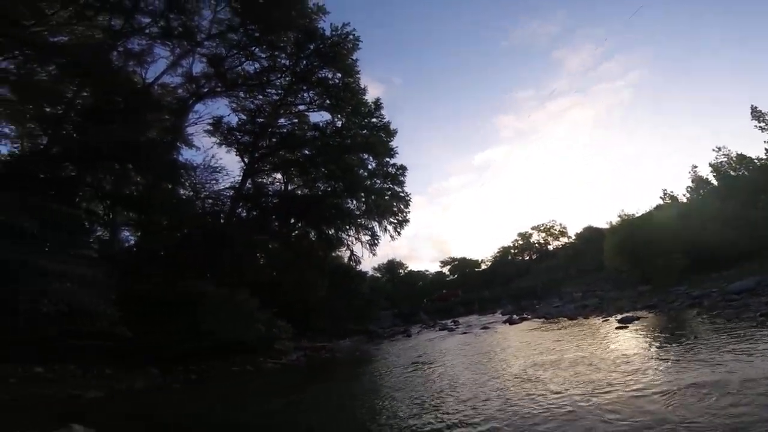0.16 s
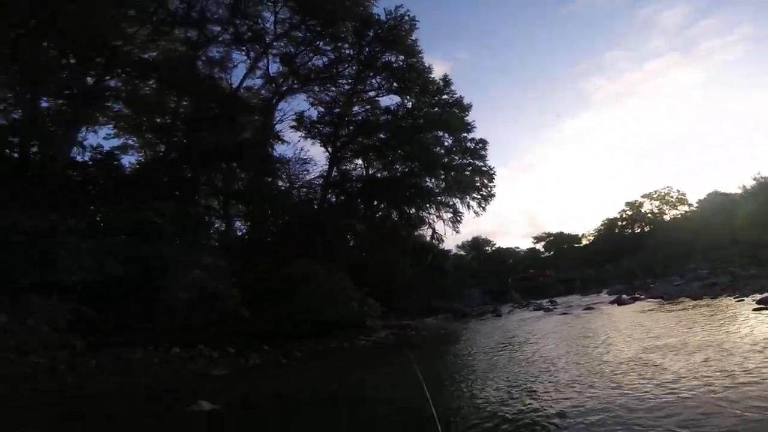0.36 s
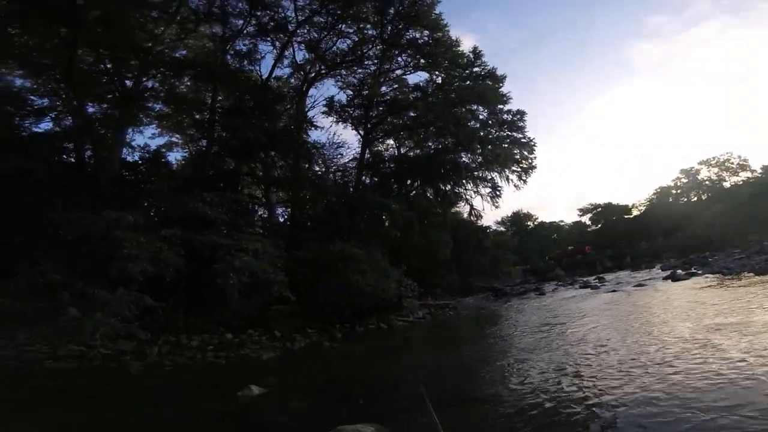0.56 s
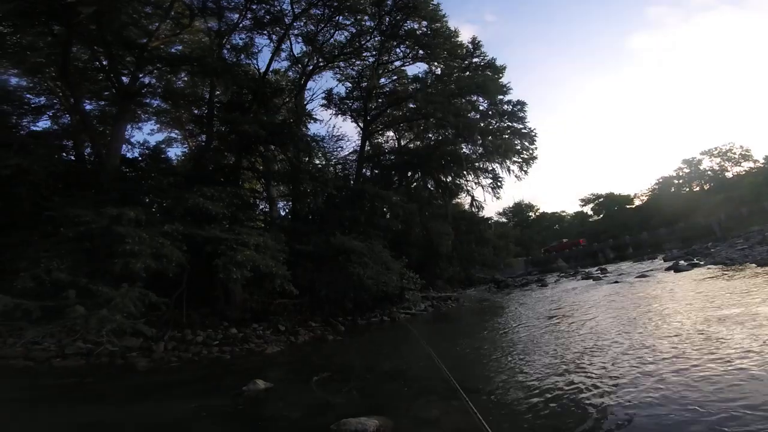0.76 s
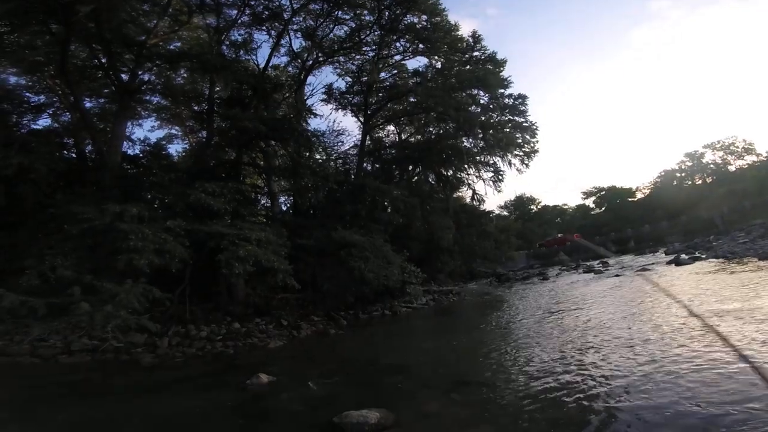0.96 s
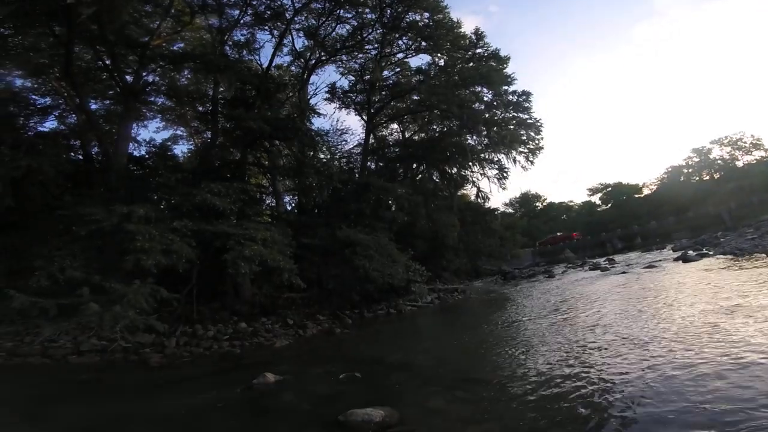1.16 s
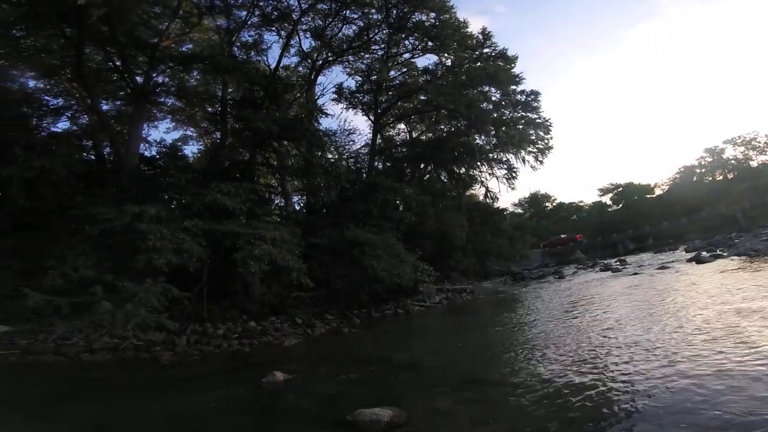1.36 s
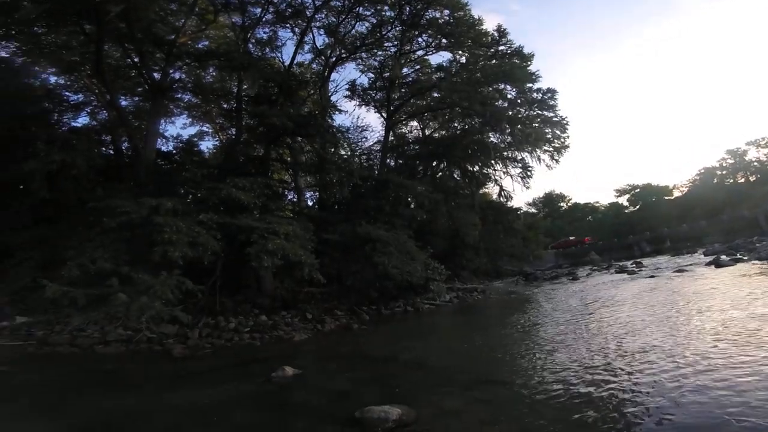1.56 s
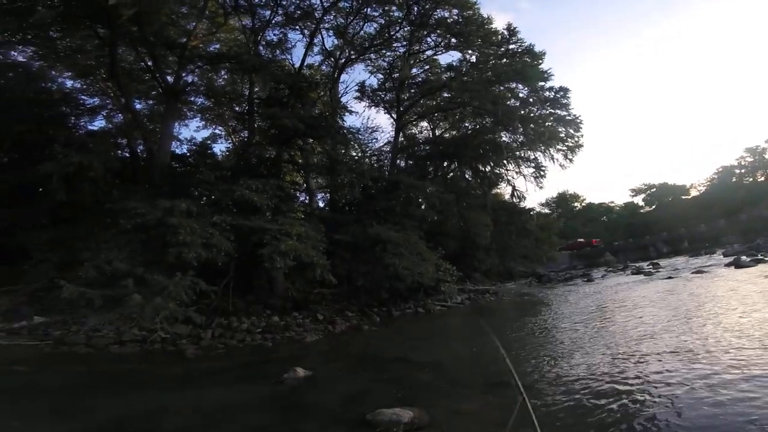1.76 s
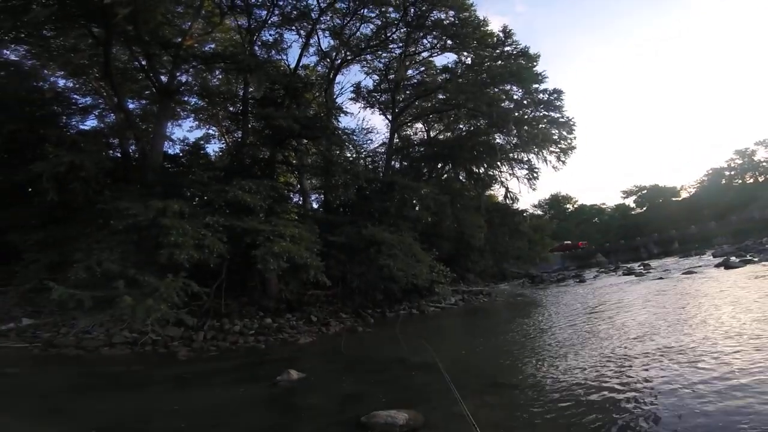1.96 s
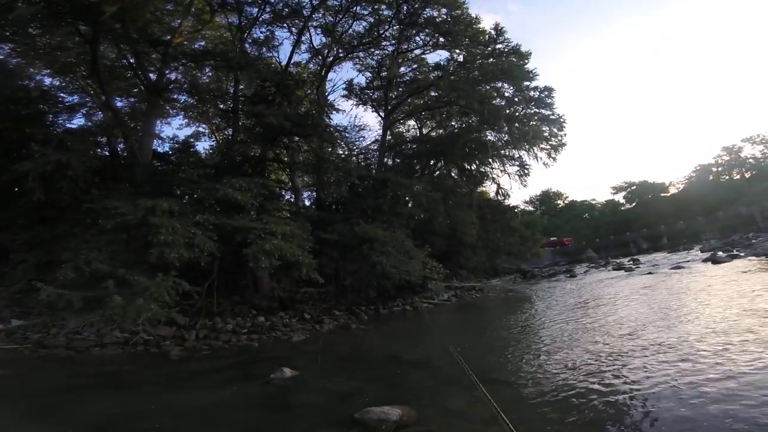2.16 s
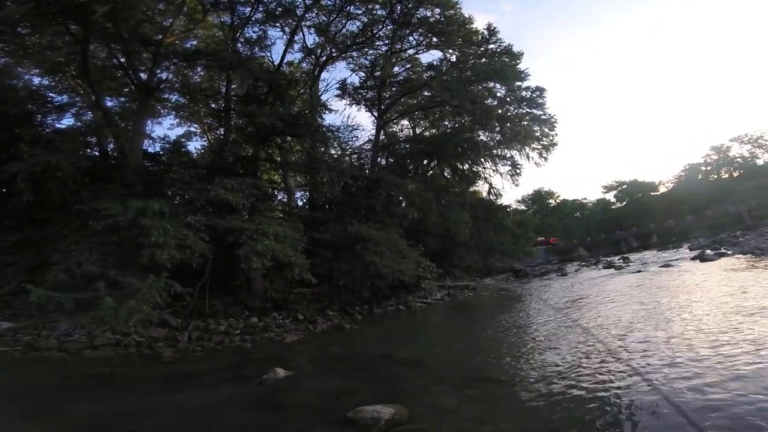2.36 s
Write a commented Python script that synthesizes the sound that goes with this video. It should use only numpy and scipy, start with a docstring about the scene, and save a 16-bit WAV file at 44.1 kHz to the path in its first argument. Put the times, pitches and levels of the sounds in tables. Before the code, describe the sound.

Fishing rod swishing back and forth over the steady rush of a river.

```python
"""Beside a shallow river, a fly rod is whipped back and forth, heard from inside a case worn by the angler.
Turbulent water rushes and its bubbles ring throughout, over a low rumble of air on the case.
The line hisses through the guides, rod and line whistle as they shed vortices, the line ticks
against the rod, the tackle rattles, and the line finally lands on the water with a hiss.
The case's resonances colour the treble of it all."""
import sys
import numpy as np
from scipy import signal
from scipy.fft import rfft, irfft
from scipy.io import wavfile

SR = 44100
rng = np.random.default_rng(int(sys.argv[2]) if len(sys.argv) > 2 else 0)


def store_pcm(level_fs):
    """Save levels as 16-bit WAV."""
    pcm = np.round(np.clip(level_fs, -1, 1) * 32767).astype(np.int16)
    wavfile.write(sys.argv[1], SR, np.atleast_2d(pcm).T)


N = 105840
T = np.arange(N) / SR


def undb(db):
    """Decibels to amplitude ratio."""
    return 10 ** (np.asarray(db) / 20)


def unit(x):
    """Normalise to rms 1."""
    return x / np.sqrt(np.mean(x ** 2))


def colour(x, points, size=4096):
    """Minimum-phase filter through points of (frequency [Hz], gain [dB])."""
    hz, db = np.array(points).T
    f = np.maximum(np.fft.rfftfreq(size, 1 / SR), 1)
    cepstrum = irfft(np.log(undb(np.interp(np.log(f), np.log(hz), db))))
    cepstrum[1:size // 2] *= 2
    cepstrum[size // 2 + 1:] = 0
    return signal.fftconvolve(x, irfft(np.exp(rfft(cepstrum))))[:N]


def noise(gain):
    """Gaussian noise of rms 1, its amplitude spectrum shaped by gain(frequency [Hz])."""
    f = np.maximum(np.fft.rfftfreq(N, 1 / SR), 1)
    return unit(irfft(rfft(rng.standard_normal(N)) * gain(f), N))


def walk(bandwidth_hz):
    """Smooth random fluctuation: low-pass noise of rms 1."""
    return noise(lambda f: np.exp(-(f / bandwidth_hz) ** 2))


def decay(start, seconds):
    """Envelope of a damped vibration: sudden onset, exponential fall."""
    return (T >= start) * np.exp(-np.maximum(T - start, 0) / seconds)


def river(bands=8, level_db=-48.5, swell_db=.53, ripple_db=.96):
    """Turbulence over stones makes broadband noise: octave bands ripple singly and swell together."""
    # spectrum of the rush: (frequency [Hz], relative level [dB])
    spectrum = [(100, 1.5), (300, 1), (480, -1), (750, -0.5), (1000, -2), (1300, -6.5), (1700, -5.5),
                (2500, -10.5), (4200, -17), (7000, -19), (9300, -21.5), (13000, -23)]
    edges = np.concatenate([[0], SR / 2 / 2. ** np.arange(bands)[::-1]])
    rush = 0
    for low, high in zip(edges, edges[1:]):
        band = np.sqrt(high - low) * noise(lambda f: (f > low) & (f <= high))
        rush += band * undb(ripple_db * walk(23))
    return undb(level_db + swell_db * walk(4.3)) * unit(colour(rush, spectrum))


def bubbles(per_second=500, level_db=-60, low_hz=502.4, high_hz=2590, decay_cycles=4.8, size=2048):
    """Bubble resonance: each small pocket of trapped air rings as a damped oscillator, rising in pitch."""
    out, t = np.zeros(N + size), np.arange(size) / SR
    for when, pitch, chance in rng.random((int(per_second * N / SR), 3)):
        hz = low_hz * (high_hz / low_hz) ** pitch
        age = hz * t / decay_cycles
        strength_db = min(-4.5 * np.log(1 - chance), 13.5)  # exponentially distributed, with a cap
        ring = np.exp(-age) * np.sin(2 * np.pi * hz * t * (1 + .03 * age))
        onset = int(when * N)
        out[onset:onset + size] += undb(strength_db) * ring
    return undb(level_db) * unit(out[:N])


def rumble(settle_db_per_s=2.5):
    """Forced vibration: air and movement shake the case, whose low modes fade as the angler settles."""
    # spectrum of the air on the case: (frequency [Hz], relative level [dB])
    spectrum = [(8, -8), (18, -6), (30, -1.5), (40, 3.5), (54, -9), (85, -7), (115, -8.5), (160, -27),
                (400, -40.5)]
    # envelope of that air noise: (time [s], level [dB])
    envelope = [(0, -48), (.2, -46), (.36, -42), (.65, -47), (1.25, -49.5), (1.55, -50), (1.82, -44),
                (2.1, -51.5), (2.4, -52.5)]
    # low modes of the case: (frequency [Hz], half-width [Hz], initial level [dB])
    modes = [(128.3, 10, -55.5), (184, 8, -56.5), (208.7, 16, -57.5), (255.6, 10, -61.5)]
    hz, db = np.array(spectrum).T
    air = noise(lambda f: undb(np.interp(np.log(f), np.log(hz), db)))
    air *= undb(np.interp(T, *np.array(envelope).T))
    ring = sum(undb(level) * noise(lambda f: 1 / (1 + ((f - centre) / width) ** 2))
               for centre, width, level in modes)
    return air + ring * undb(-settle_db_per_s * T)


def line_hiss(grain_db=3.0, grain_hz=500, top_hz=10500):
    """Contact noise in grainy swells: the line runs through the guides and finally lands on the water."""
    # swells of hiss: (peak time [s], level [dB], rise [s], fall [s], centre [Hz], half-width [octaves])
    swells = [(.235, -57.5, 0.046, 0.062, 5240, 0.41), (.34, -53.5, 0.013, .012, 7000, 1),
              (.417, -39, .008, .010, 3900, .33), (.425, -48, .02, .075, 2700, .8),
              (.456, -39, 0.013, 0.016, 6900, .42), (.476, -40, .016, 0.014, 6000, .7),
              (0.502, -46.5, 0.004, .008, 4100, 0.72), (.53, -55, 0.04, 0.047, 4700, 1),
              (.583, -54, 0.0024, 0.0055, 3500, .5), (1.165, -50.5, .07, .05, 5460, .28),
              (1.302, -39.5, .008, .007, 5500, .7), (1.33, -56, 0.033, .05, 4970, 1),
              (1.708, -54, .018, 0.046, 6000, .5), (1.737, -46.5, .005, .004, 3800, .35),
              (1.762, -49, .016, .018, 7400, 1), (1.83, -52.5, .014, .02, 3700, .65),
              (1.865, -54, .02, .07, 2700, .6), (1.945, -61, 0.033, .03, 6500, 0.32)]
    out = 0
    for peak, db, rise, fall, hz, octaves in swells:
        swell = np.where(T < peak, np.exp(-((T - peak) / rise) ** 2), decay(peak, fall))
        hiss = noise(lambda f: 1 / (1 + (np.log2(f / hz) / octaves) ** 2)
                     * (f / (f + hz / 10)) ** 2  # bass roll-off
                     / (1 + (f / top_hz) ** 12))
        out += undb(db) * swell * hiss
    return out * unit(undb(grain_db * walk(grain_hz)))


def whistle(flutter_hz=530, flutter_db=2.7, waver=.009, skirt_hz=1220, side_ratio=.955, side_db=-11):
    """Aeolian tone: rod and line shed vortices at a frequency that climbs with their speed."""
    # course of the tone, one list per stroke of the rod: (time [s], frequency [Hz], level [dB])
    strokes = [
        [(.406, 3110, -58), (.412, 3550, -40), (.419, 4155, -36), (.423, 4700, -31.5), (.434, 4860, -25.7),
         (.443, 4892, -31.5), (.449, 5250, -34), (.454, 6500, -46), (.462, 6940, -60)],
        [(1.731, 3400, -54), (1.737, 3700, -49), (1.7415, 4550, -50), (1.744, 4720, -37.5), (1.7475, 4850, -52),
         (1.7503, 4980, -36.7), (1.755, 5150, -54), (1.759, 5460, -64)],
        [(1.818, 3500, -62), (1.827, 4100, -56), (1.835, 4880, -50), (1.842, 5170, -70)],
    ]
    # timbre of each stroke, relative to the tone: (noise at the peak [dB], second harmonic [dB])
    timbres = [(-17, -40), (-8, -15), (-4, -20)]
    out = 0
    for stroke, (skirt_db, octave_db) in zip(strokes, timbres):
        times, hz, db = np.array(stroke).T
        level = np.interp(T, times, db)
        pitch = np.interp(T, times, hz) * (1 + waver * walk(flutter_hz))
        phase = 2 * np.pi * np.cumsum(pitch) / SR
        side = undb(side_db) * np.sin(side_ratio * phase)  # a slower stretch of line beats with the tone
        partials = np.sin(phase) + side + undb(octave_db) * np.sin(2 * phase)
        flutter = undb(flutter_db * np.clip(walk(flutter_hz), -3, 1))
        tone = unit(flutter * partials)
        skirt = unit(walk(skirt_hz) * np.sin(phase) + walk(skirt_hz) * np.cos(phase))
        breath = undb(skirt_db + .4 * (db.max() - level))  # noisier where the tone is weak
        sounding = (T > times[0]) * (T < times[-1])
        out += sounding * undb(level) * (tone + breath * skirt) / np.hypot(1, breath)
    return out


def line_ticks(fizz_db=-17.5, fizz_s=.0025):
    """Impact excitation: the line strikes the rod, giving a ring of a few cycles and a short fizz."""
    # strikes: (time [s], level [dB], ring frequency [Hz], rise [s])
    strikes = [(.4406, -24, 7600, .00018), (.4585, -21, 7400, .00024), (.4662, -17.5, 6100, .00016),
               (0.4761, -19.5, 5700, .00013), (0.8566, -38.5, 5240, .0004), (1.229, -39, 4900, .0003),
               (1.3330, -34.5, 6100, .0004), (1.712, -43, 6200, .0003), (1.767, -39, 6500, 0.00033),
               (1.7908, -40, 8000, .00015), (1.815, -35, 5300, 0.00013)]
    fizz = noise(lambda f: np.exp(-(np.log2(f / 6000) / .41) ** 2))
    out = 0
    for start, db, hz, rise in strikes:
        age = np.maximum(T - start, 0) / rise
        ring = (age * np.exp(1 - age)) ** 2 * np.sin(2 * np.pi * hz * (T - start))
        out += undb(db) * (ring + undb(fizz_db) * decay(start, fizz_s) * fizz)
    return out


def plops(decay_s=.004):
    """Damped oscillation: a few single bubbles near the bank ring just above the rush."""
    # bubbles: (time [s], level [dB], frequency [Hz])
    rings = [(0.635, -44, 1410), (.969, -46, 1900), (1.593, -44, 1550)]
    return sum(undb(db) * decay(start, decay_s) * np.sin(2 * np.pi * hz * (T - start))
               for start, db, hz in rings)


def tackle_rattle():
    """Heavily damped impacts: the tackle knocks in quick, dry bursts of noise."""
    # knocks: (time [s], relative level [dB], decay time [s])
    knocks = [(1.2640, -42, .002), (1.2665, -36.5, .0022), (1.2784, -43, .002), (1.2815, -25.5, .0013),
              (1.2843, -25, .0016), (1.2915, -34.5, .003)]
    # response of the tackle: (frequency [Hz], gain [dB])
    response = [(300, -16), (1000, -7), (2100, -1.5), (2700, -7), (4000, -3.5), (6500, -1), (8300, -1),
                (10000, -3), (13000, -12)]
    blows = sum(undb(db) * decay(start, decay_s) for start, db, decay_s in knocks)
    return 2 * colour(blows * rng.standard_normal(N), response)


def scene():
    """Superposition: the river, the rumble and the nearby casts add in one channel."""
    background = river() + bubbles() + rumble()
    return (background + line_hiss() + whistle() + line_ticks() + plops() + tackle_rattle())[None]


def record(dry, top_hz=14300):
    """Enclosure resonance: the case rings in the treble, and a steep low-pass filter cuts the top."""
    # response of the case: (frequency [Hz], gain [dB])
    response = [(1000, 0.5), (4200, 1), (4850, 5.5), (5600, 5), (6100, 1.5), (6500, 8), (7000, 0.5),
                (8000, -2), (9300, -4), (10300, -13), (13000, -9.5), (14300, -30)]
    low_pass = signal.ellip(8, .2, 70, top_hz, fs=SR, output="sos")
    return signal.sosfilt(low_pass, colour(dry[0], response))[None]


dry = scene()
out = record(dry)
store_pcm(out)
```